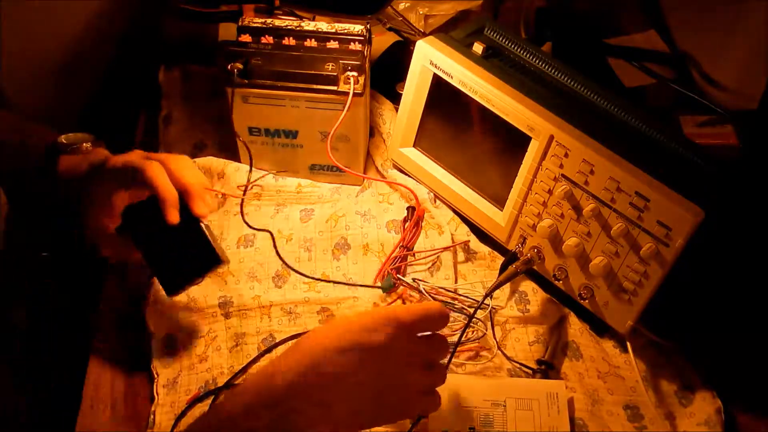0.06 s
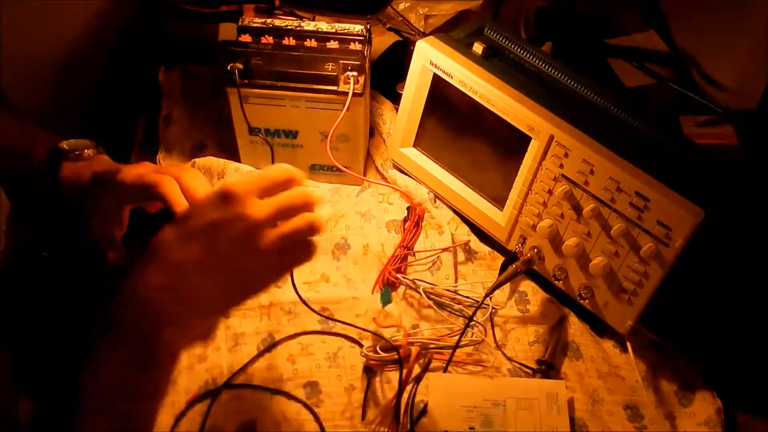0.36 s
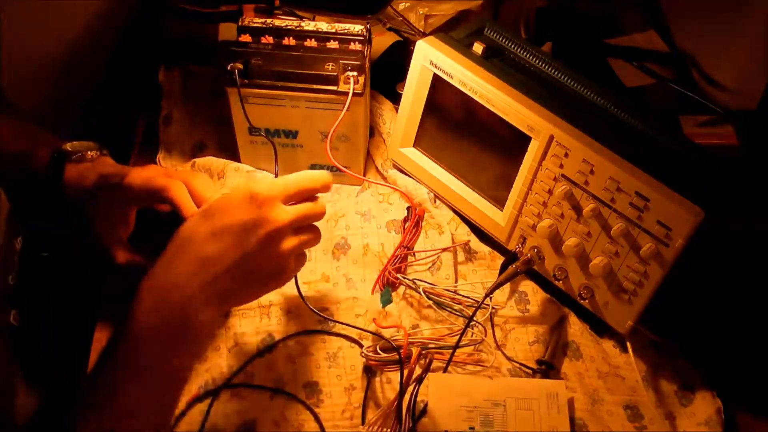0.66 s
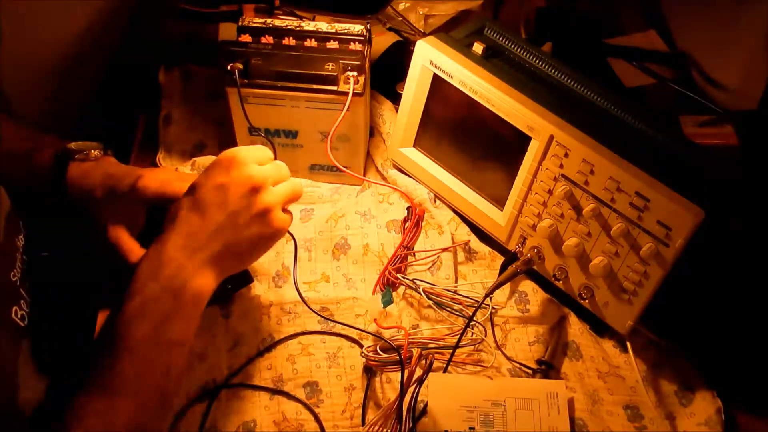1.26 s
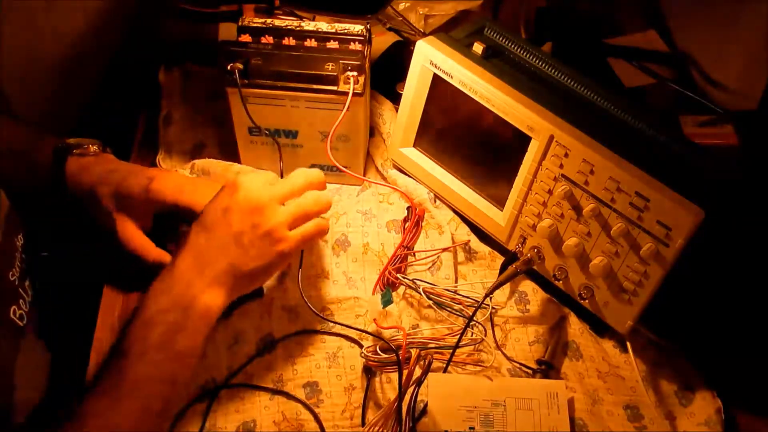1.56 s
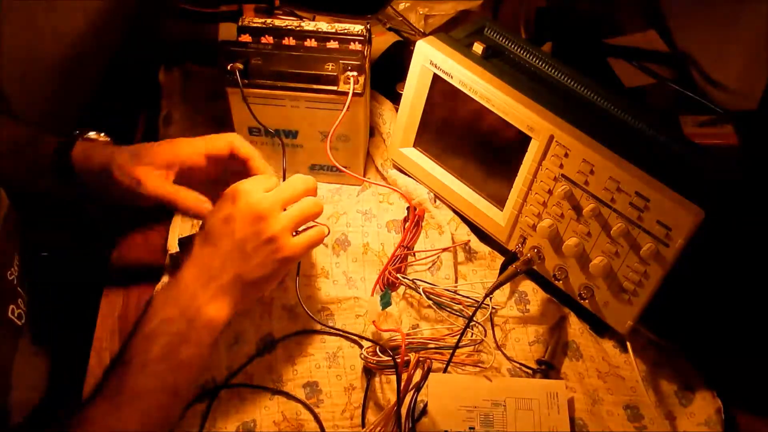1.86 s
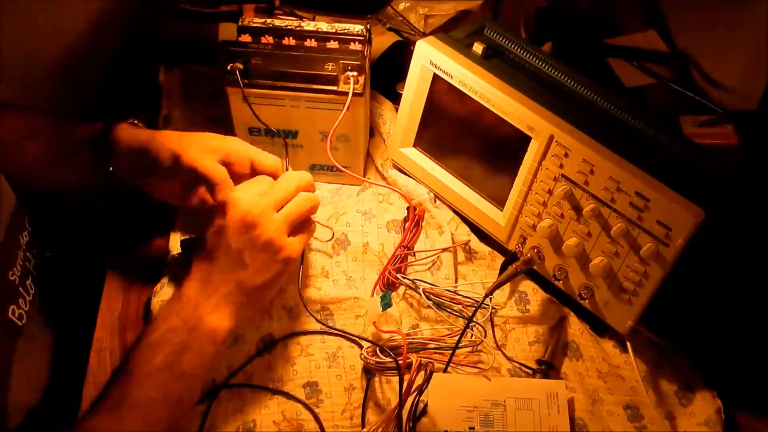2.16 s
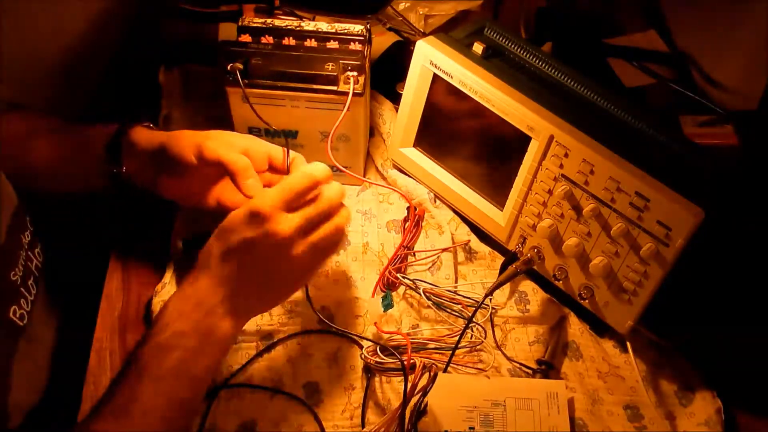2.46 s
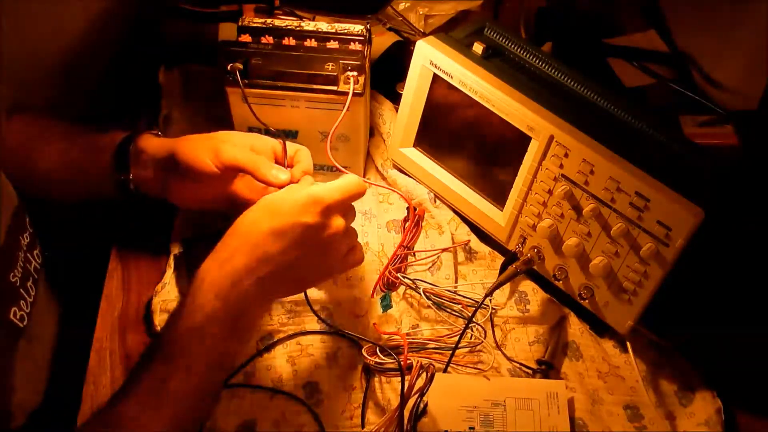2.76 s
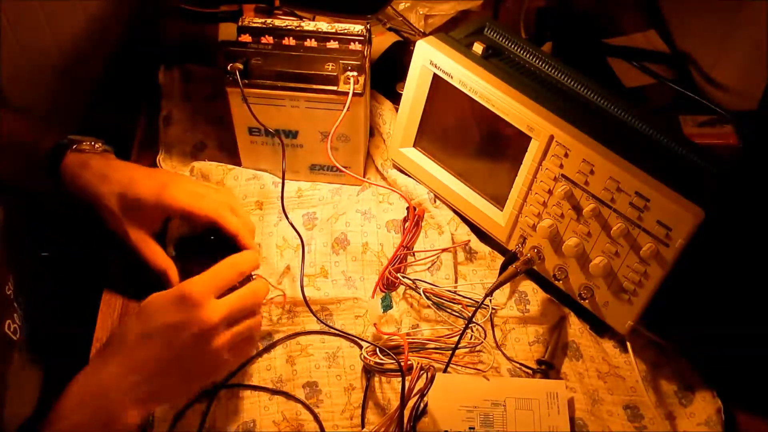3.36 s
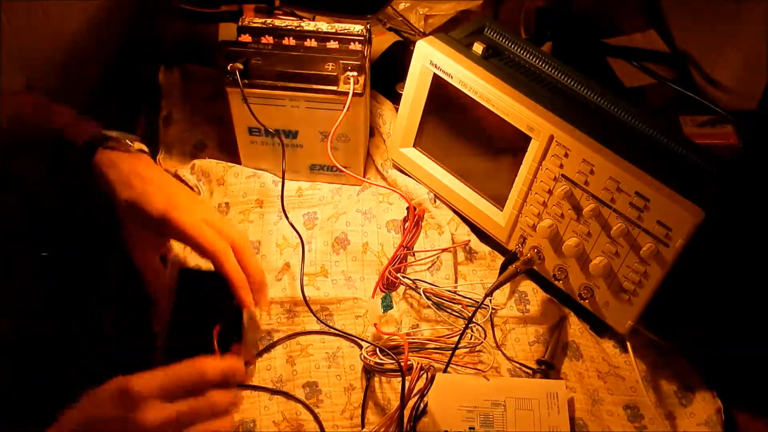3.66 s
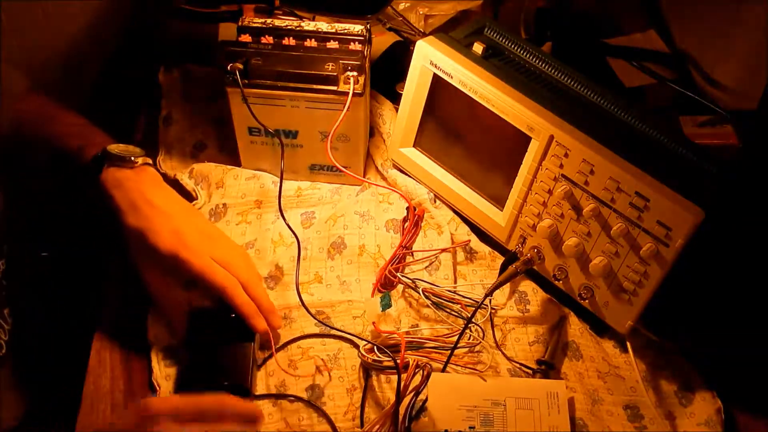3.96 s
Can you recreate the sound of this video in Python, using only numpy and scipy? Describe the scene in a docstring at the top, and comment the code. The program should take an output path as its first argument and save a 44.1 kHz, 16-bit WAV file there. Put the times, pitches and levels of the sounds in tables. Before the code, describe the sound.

A small electric lock actuator snaps and clunks twice on a workbench over quiet hum.

```python
"""A low hum comes and goes while hands rustle and softly bump a workbench in a small room.
They are testing a small electric lock actuator. Each touch of the wire on its contact gives a bright
snap; some 20 ms later the plunger (the sliding rod) hits its stop and makes the housing clunk.
The hardest hits also thump the bench. A faint steady hiss lies underneath."""
import sys
import numpy as np
from scipy import signal
from scipy.fft import rfft, irfft, next_fast_len
from scipy.io import wavfile
from scipy.ndimage import uniform_filter1d, map_coordinates

SR = 44100
rng = np.random.default_rng(int(sys.argv[2]) if len(sys.argv) > 2 else 0)


def store_pcm(level_fs):
    """Save levels as 16-bit WAV."""
    pcm = np.round(np.clip(level_fs, -1, 1) * 32767).astype(np.int16)
    wavfile.write(sys.argv[1], SR, np.atleast_2d(pcm).T)


N = 176400  # 4 seconds

# Tone of the low noise in the bench thuds and the hum: pitch_hz, level_db
RUMBLE = [(25, -10), (90, -1.5), (190, -8.5), (260, -19), (500, -19), (2500, -96)]
# How alike left and right are for direct sound (1 = the same): pitch_hz, likeness
DIRECT_ALIKE = [(400, 0.85), (6000, 0.64), (11000, 0.081)]
# The same for sound spread around the room: pitch_hz, likeness
ROOM_ALIKE = [(900, 0.92), (2600, 0.8), (9000, 0.018)]
ATTACK_S = 0.00034  # how quickly a hit or tick rises


def plunger_clunks():
    """The plunger hits its stop and bounces: the housing rings and loose parts rattle."""
    # Hits and bounces: start_s, level_db, contact_s, favoured_hz, tilt_db_per_octave, rattle_db
    hits = [(1.629, -41.5, 0.0082, 1070, -2, 4), (1.6402, -15, 0.0027, 1098, -1.5, -3.5),
            (1.666, -30.5, 0.0051, 1120, -7.5, -6.5), (1.678, -36, 0.0055, 405, -4, -7.5),
            (1.706, -37, 0.0027, 720, 1, -5), (1.745, -50.5, .04, 1110, -2, -11),
            (3.3168, -44.5, 0.0069, 3750, 5, -2), (3.7967, -29.5, 0.024, 854, -1.5, -10),
            (3.845, -10, 0.0084, 602, -1, -10.5), (3.879, -23.5, 0.0025, 1000, -2, -5),
            (3.937, -36, .016, 803, -1, -9), (3.977, -46, 0.0059, 1200, -2, -4)]
    # Notes the housing rings at: pitch_hz, level_db, fade_s (time to fall by 60 dB)
    housing_notes = [(400.7, -11.5, 0.11), (472, -7.5, 0.044), (607, -6, 0.045), (640, -6.5, 0.066),
                     (694, -7, 0.081), (807, 1, 0.076), (915, -1.5, 0.052), (1061, -4, 0.025),
                     (1155, -7.5, 0.045), (1298, -1, 0.024), (1853, -9.5, 0.019), (2154, -9, .075),
                     (2254, -10.5, 0.03), (2680, -11.5, .05), (2810, -13, 0.036), (3790, -15, 0.021)]
    # Tone of the rattle: pitch_hz, level_db
    rattle_tone = [(60, -22), (185, 5), (255, -2.5), (400, -2.5), (580, 2), (1150, 2), (1500, -4),
                   (2700, -1), (4000, -11), (7000, -35), (16000, -50)]
    lift_db, lift_octaves = 14.5, 0.1  # notes near a hit's favoured pitch ring louder
    grip_detune = 0.0044  # share by which the hand's grip shifts each note from hit to hit
    hz, note_db, fade_s = np.transpose(housing_notes)[:, :, None]
    t = np.arange(SR // 2) / SR
    out = np.zeros((2, N))
    for start_s, level_db, contact_s, favoured_hz, tilt, rattle_db in hits:
        since_hit = clock() - start_s
        lift = lift_db * np.exp(-.5 * (np.log2(hz / favoured_hz) / lift_octaves) ** 2)
        gains = amp(note_db + lift + tilt * np.log2(hz))
        fades = envelope(t, ATTACK_S, contact_s, fade_s)
        shifted_hz = hz * (1 + grip_detune * rng.standard_normal(hz.shape))
        waves = np.sin(2 * np.pi * (shifted_hz * t + rng.random(hz.shape)))
        ring = np.sqrt(2) * (gains * fades * waves).sum(0) / np.linalg.norm(gains)
        rattle = noise(lambda f: look_up(rattle_tone, f) + tilt * np.log2(np.clip(f, 500, 4000)),
                       DIRECT_ALIKE)
        rattle *= amp(rattle_db) * envelope(since_hit, ATTACK_S, contact_s, fade_s=0.044)
        out += amp(level_db) * (np.interp(since_hit, t, ring, 0, 0) + rattle)
    return out


def wire_snaps():
    """The wire scrapes onto the contact and snaps in a bright burst of noise."""
    # Touches of the wire: start_s, level_db, hold_s, treble_tilt_db_per_octave
    touches = [(1.619, -26, 0.0015, -2), (3.298, -26, 0.00087, 7), (3.782, -39, 0.0053, -5),
               (3.8258, -22, 0.0044, -1)]
    # Tone of a snap: pitch_hz, level_db
    snap_tone = [(200, -9), (3400, -12), (4700, 3), (6200, -2.5), (10300, 0), (12500, -4.5), (14000, -22)]
    scrape_db, scrape_s = -14.5, 0.012
    out = np.zeros((2, N))
    for start_s, level_db, hold_s, tilt in touches:
        t = clock() - start_s
        scrape = amp(scrape_db) * np.exp(-np.abs(t) / scrape_s)  # swells before the snap, fades after
        snap = envelope(t, rise_s=0.0013, hold_s=hold_s, fade_s=0.02)
        burst = noise(lambda f: look_up(snap_tone, f) + tilt * np.log2(np.maximum(f, 4000)),
                      DIRECT_ALIKE)
        out += amp(level_db) * (snap + scrape) * burst
    return out


def bench_thumps():
    """Hands and plunger thump the bench top: a dull thud and two low booming notes."""
    # Thumps: start_s, level_db, fade_s
    thumps = [(0.092, -44.5, 0.21), (1.198, -40.5, 0.073), (1.638, -33.5, 0.28), (1.741, -46, 0.17),
              (1.866, -50, 0.17), (2.299, -47, 0.21), (2.429, -50, 0.1), (2.546, -44, 0.22),
              (3.093, -42, 0.13), (3.592, -50, 0.091), (3.801, -24.5, 0.13), (3.849, -23.5, 0.29)]
    low_hz, upper_hz = 105.8, 167.4
    thud = amp(-9.5) * noise(lambda f: look_up(RUMBLE, f), DIRECT_ALIKE)
    out = np.zeros((2, N))
    for start_s, level_db, fade_s in thumps:
        t = clock() - start_s
        low = np.sin(2 * np.pi * low_hz * t)
        upper = amp(-12) * np.sin(2 * np.pi * upper_hz * t)
        boom = np.sqrt(2) * (low + upper)
        out += amp(level_db) * (boom + thud) * envelope(t, rise_s=0.017, hold_s=0.0097, fade_s=fade_s)
    return out


def low_hum():
    """A low, slightly wavering hum swells and fades together with a soft rumble."""
    # Swells of the hum: start_s, length_s, level_db
    swells = [(-.02, 0.063, -53), (0.211, 0.13, -46.5), (0.358, 0.18, -47.5), (0.558, 0.13, -51),
              (0.691, 0.12, -65.5), (0.787, 0.22, -51), (1.099, 0.079, -54.5), (1.244, 0.12, -51.5),
              (1.418, 0.15, -49), (1.554, 0.095, -48)]
    hum_hz, waver_share, edge_s = 100.8, 0.0386, 0.038
    t = clock()
    level = np.zeros(N)
    for start_s, length_s, level_db in swells:
        inside_s = np.minimum(t - start_s, start_s + length_s - t)  # time to the nearer end
        level += amp(level_db) * np.sin(np.pi / 2 * np.clip(inside_s / edge_s, 0, 1))
    pitch_hz = hum_hz * (1 + waver_share * wobble(7.7))
    phase = 2 * np.pi * np.cumsum(pitch_hz) / SR
    octave = amp(-15.5 + 3.4 * wobble(43.0)) * np.sin(2 * phase)
    tone = unit(np.sin(phase) + octave)
    flutter = amp(2.3 * wobble(33.96))
    rumble = amp(-9) * noise(lambda f: look_up(RUMBLE, f), DIRECT_ALIKE)
    return level * flutter * (tone + rumble)


def handling():
    """Sleeve and wires rustle; fingers rub the housing and make small ticks."""
    # Loudness of the rustle: time_s, level_db
    rustle_levels = [(0, -65.5), (1.2, -86), (1.4, -67), (1.6, -64), (1.85, -74), (2.1, -66), (2.3, -70.5),
                     (3, -78), (3.2, -62), (3.45, -62), (3.58, -59), (3.73, -64), (3.9, -53.5)]
    # Tone of the rustle: pitch_hz, level_db
    rustle_tone = [(2000, -46), (4500, -3.5), (7500, -6.5), (10500, 1), (12000, -5.5), (16000, -23)]
    # Loudness of the rubbing: time_s, level_db
    rub_levels = [(0, -67.5), (1.1, -65), (2, -71), (2.4, -68.5), (3.1, -75.5), (3.4, -56.5), (3.7, -70)]
    # Ticks and taps, the low ones lasting longer: start_s, level_db, pitch_hz
    ticks = [(.034, -49, 159.5), (0.085, -51, 2480), (2.486, -52, 2400), (2.695, -51, 6800)]
    rub_hz = 1010
    t = clock()
    rustle_db = np.interp(t, *np.transpose(rustle_levels)) + 1.3 * wobble(30.17)
    out = amp(rustle_db) * noise(lambda f: look_up(rustle_tone, f), ROOM_ALIKE)
    rub_db = np.interp(t, *np.transpose(rub_levels))
    rub = noise(lambda f: -8 * np.log2((f + 1) / rub_hz) ** 2, ROOM_ALIKE)
    out += amp(rub_db) * patchy(rub, depth_db=5)
    for start_s, level_db, hz in ticks:
        tick = noise(lambda f: -24 * np.abs(np.log2((f + 1) / hz)), DIRECT_ALIKE)
        out += amp(level_db) * tick * envelope(t - start_s, ATTACK_S, 4 / hz, fade_s=1 / np.sqrt(hz))
    return out


def room_echo(sound):
    """The small room answers with a short wash of echoes; the highest pitches die first."""
    # Time the echo takes to fall by 60 dB: pitch_hz, fade_s
    fade_times = [(1100, 0.31), (6000, 0.32), (12000, 0.19)]
    # Tone of the echo: pitch_hz, level_db
    echo_tone = [(100, -8), (185, -1.5), (400, -5.5), (560, -9), (1200, -5), (2500, -4.5), (3500, -8),
                 (12000, -5)]
    delay_s = 0.007
    white = noise(lambda f: 0 * f, ROOM_ALIKE)[:, :SR // 2]
    hz, t, bands = signal.stft(white, SR, nperseg=256)
    fade_s = look_up(fade_times, hz)[:, None]
    fades = np.exp(-np.log(1000) * t / fade_s)
    fades *= np.sqrt(2 * np.log(1000) / (fade_s * SR))  # long and short fades carry equal energy
    tail = signal.istft(bands * fades * amp(look_up(echo_tone, hz))[:, None], SR, nperseg=256)[1]
    tail = np.pad(tail, ((0, 0), (int(delay_s * SR), 0)))
    return signal.fftconvolve(sound.mean(0)[None], tail, axes=1)[:, :N]


def background_hiss():
    """Steady hiss with two faint whines, each a narrow band of noise."""
    # Tone of the hiss: pitch_hz, level_db
    hiss_tone = [(25, -18.5), (85, 4), (200, -7), (650, -4.5), (1300, -7), (2400, -8.5), (4500, -11.5),
                 (8000, -16), (10500, -17), (15500, -23)]
    # How alike left and right are: pitch_hz, likeness
    hiss_alike = [(950, 0.17), (5000, 0.039)]
    # Whines: pitch_hz, width_hz, level_db
    whines = [(924, 11, -77.5), (1797, 102, -69.5)]
    out = amp(-59) * noise(lambda f: look_up(hiss_tone, f), hiss_alike)
    for hz, width_hz, level_db in whines:
        whine = noise(lambda f: -20 * np.log10(1 + (2 * (f - hz) / width_hz) ** 2), ROOM_ALIKE)
        out += amp(level_db) * whine
    return out


def amp(db):
    """Turn decibels into a number to multiply by."""
    return 10 ** (np.asarray(db) / 20)


def unit(x):
    """Scale x to an average (rms) level of 1."""
    return x / np.sqrt(np.mean(x ** 2) + 1e-20)


def look_up(points, hz):
    """Read between the rows of a (pitch_hz, value) table, with octaves evenly spaced."""
    pitches, values = np.transpose(points)
    return np.interp(np.log(hz + 1), np.log(pitches + 1), values)


def clock():
    """The time of each sample in seconds."""
    return np.arange(N) / SR


def wobble(rate):
    """A smooth curve through `rate` random values a second."""
    return map_coordinates(rng.standard_normal(400), [clock() * rate], mode="mirror")


def filtered(x, gain):
    """Multiply each frequency f in x by gain(f)."""
    size = next_fast_len(N + SR // 2)
    return irfft(rfft(x, size) * gain(np.fft.rfftfreq(size, 1 / SR)), size)[..., :N]


def noise(tone_db, alike):
    """Stereo noise at level 1, shaped by tone_db(f); `alike` says how well left and right match."""
    def gains(f):
        angle = np.arccos(np.clip(look_up(alike, f), -1, 1)) / 2
        return amp(tone_db(f)) * [np.cos(angle), np.sin(angle)]
    common, side = filtered(rng.standard_normal((2, N)), gains)
    return unit(np.array([common + side, common - side]))


def envelope(t, rise_s, hold_s, fade_s):
    """Loudness of a hit: it rises from t = 0 and, after hold_s, falls 60 dB every fade_s."""
    t = np.maximum(t, 0)
    return (1 - np.exp(-t / rise_s)) * np.exp(-np.log(1000) * np.maximum(t - hold_s, 0) / fade_s)


def patchy(x, depth_db):
    """Make brief, narrow patches of pitch in x stand out by chance."""
    bands = signal.stft(x, nperseg=1024)[2]
    patches = uniform_filter1d(rng.standard_normal(bands.shape[1:]), size=3, axis=0)  # smooth in pitch
    patches = uniform_filter1d(patches, size=4, axis=1)  # and in time
    return unit(signal.istft(bands * amp(depth_db * unit(patches)), nperseg=1024)[1][:, :N])


def scene():
    """The actuator and its echo, with the bench and the quiet sounds around it."""
    # The close sounds lean to the left: pitch_hz, left_minus_right_db
    balance = [(2500, 1.65), (5000, 3.5), (10000, 0)]
    actuator = wire_snaps() + plunger_clunks()
    close = actuator + bench_thumps() + low_hum()
    placed = filtered(close, lambda f: amp(np.outer([.5, -.5], look_up(balance, f))))
    return placed + room_echo(actuator) + handling() + background_hiss()


def record(dry):
    """Turn down the deepest bass and remove the very highest treble."""
    low_cut_hz, top_hz = 43, 15800
    return filtered(dry, lambda f: (f < top_hz) * f ** 2 / np.sqrt(f ** 4 + low_cut_hz ** 4))


dry = scene()
out = record(dry)
store_pcm(out)
```